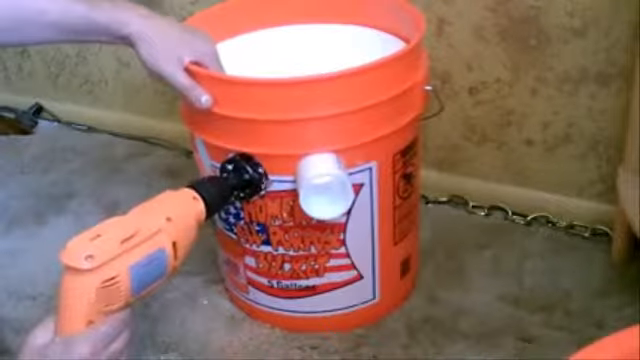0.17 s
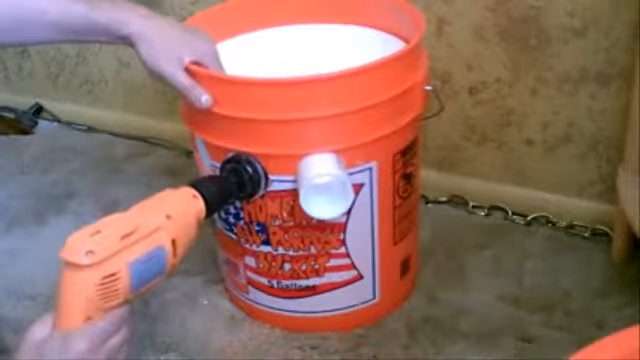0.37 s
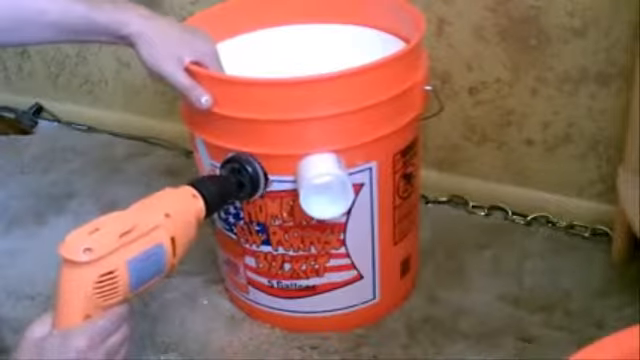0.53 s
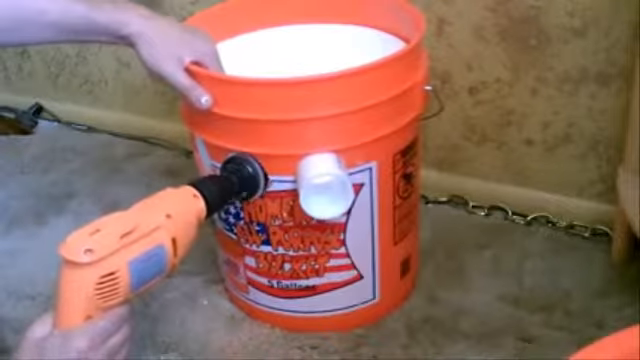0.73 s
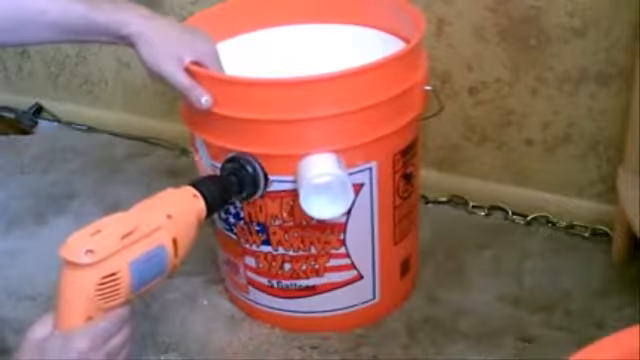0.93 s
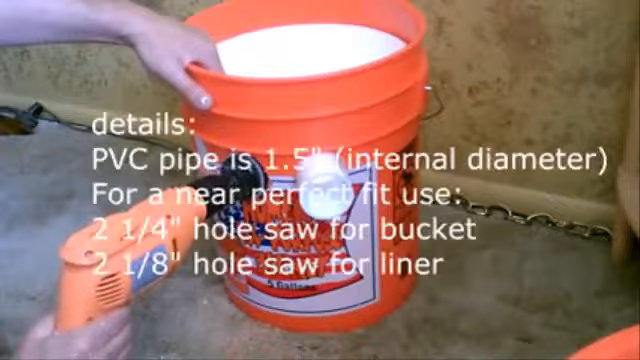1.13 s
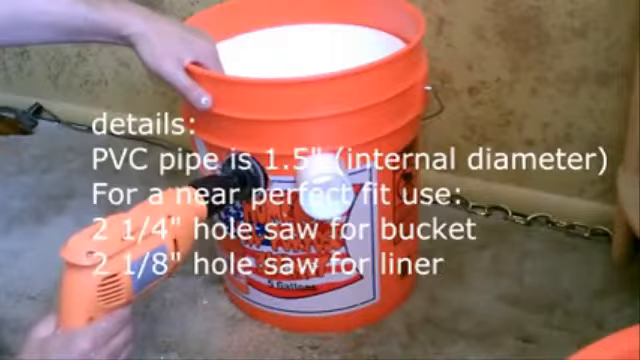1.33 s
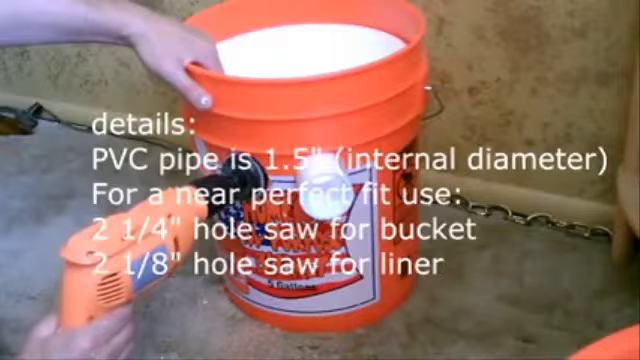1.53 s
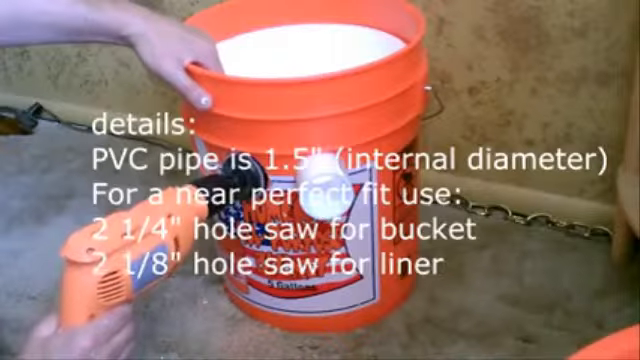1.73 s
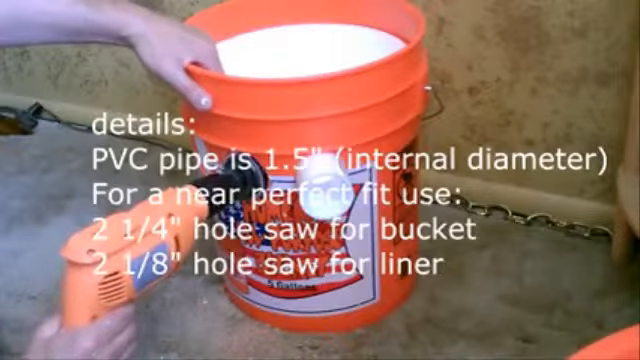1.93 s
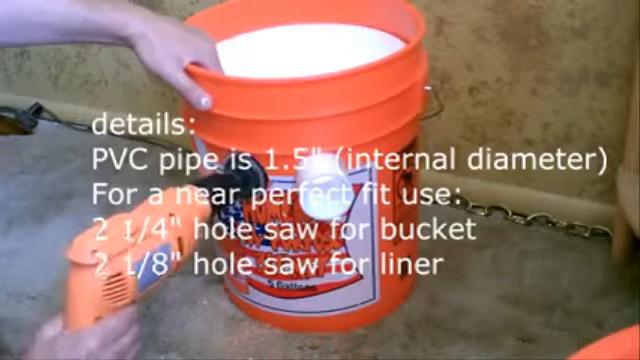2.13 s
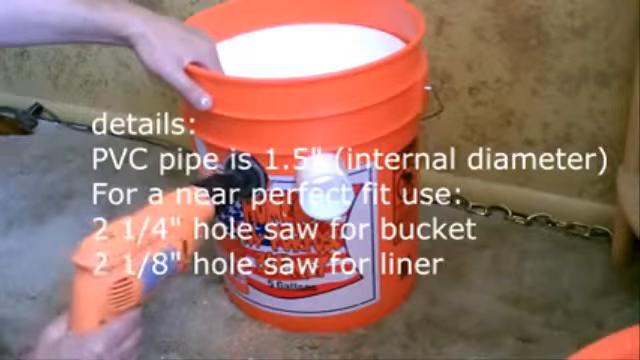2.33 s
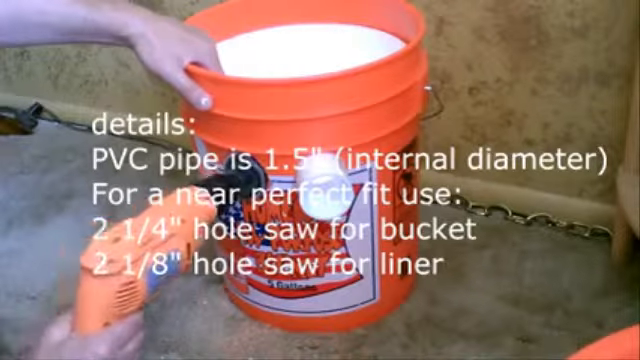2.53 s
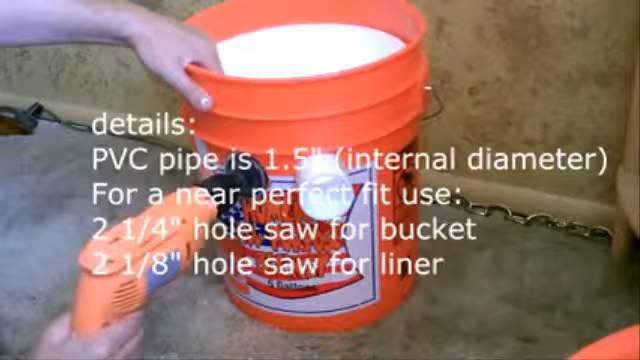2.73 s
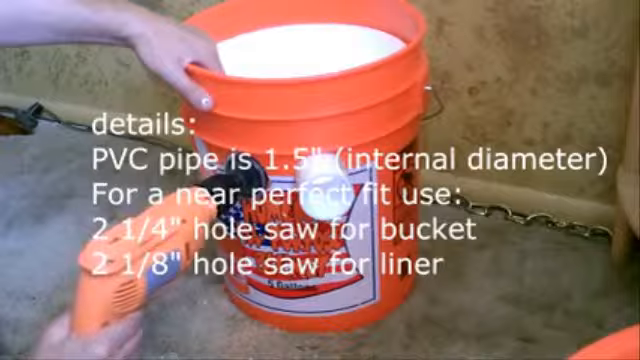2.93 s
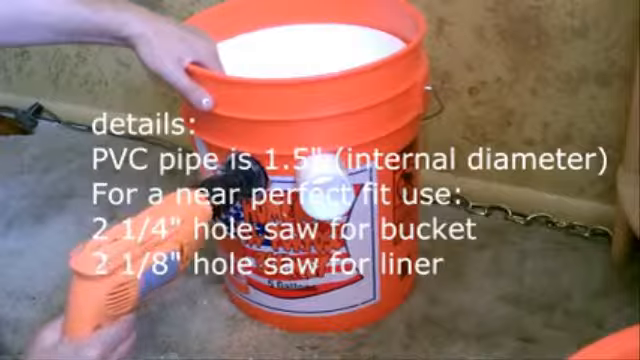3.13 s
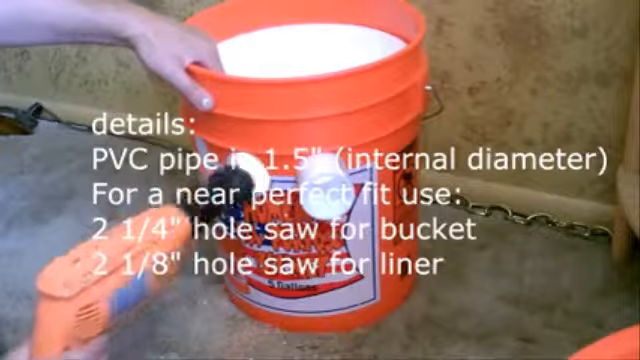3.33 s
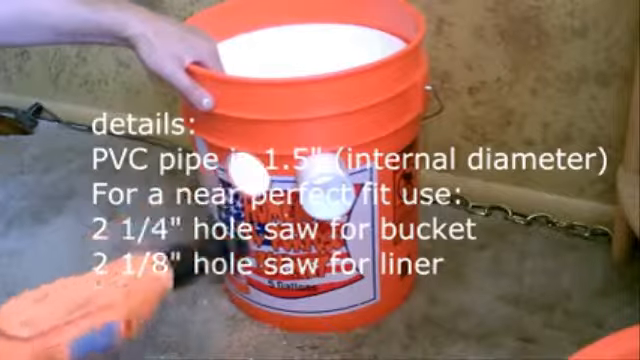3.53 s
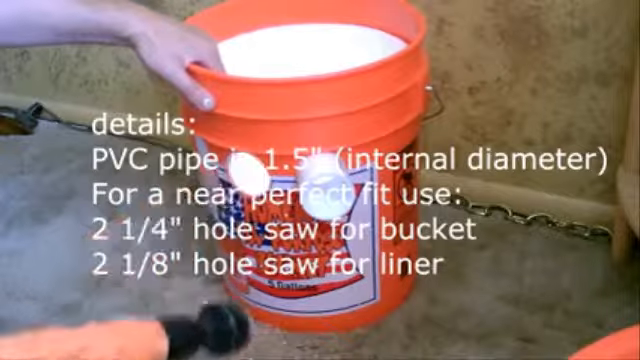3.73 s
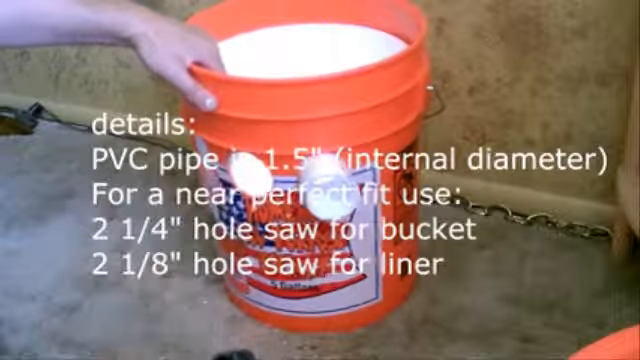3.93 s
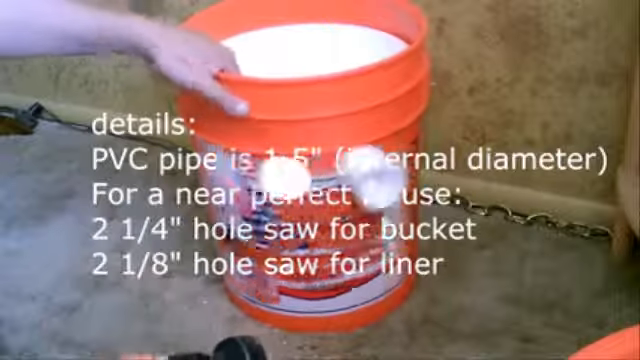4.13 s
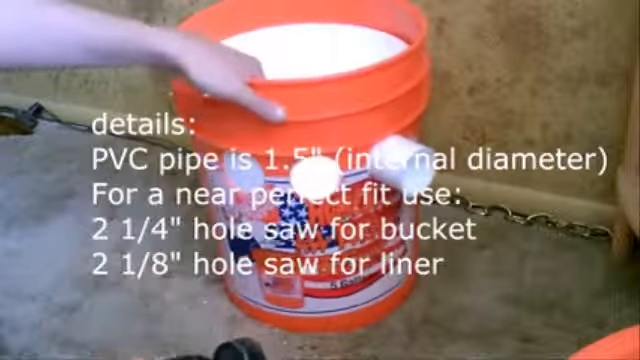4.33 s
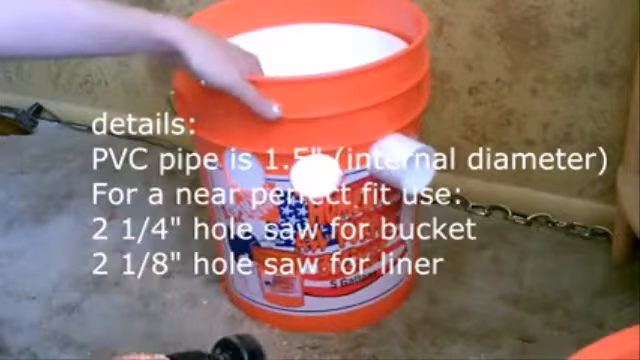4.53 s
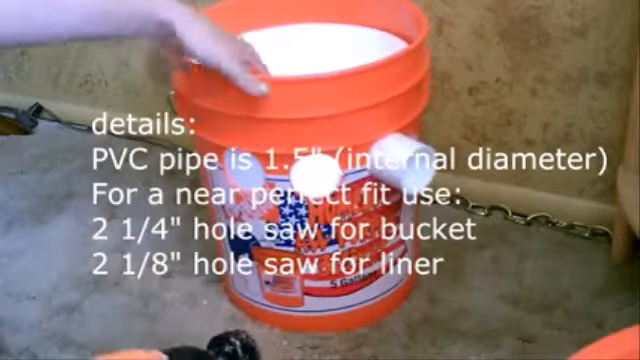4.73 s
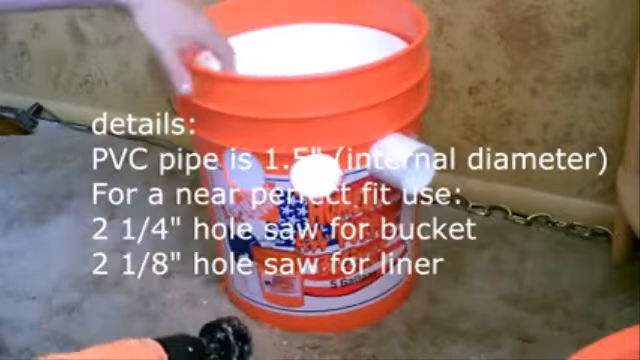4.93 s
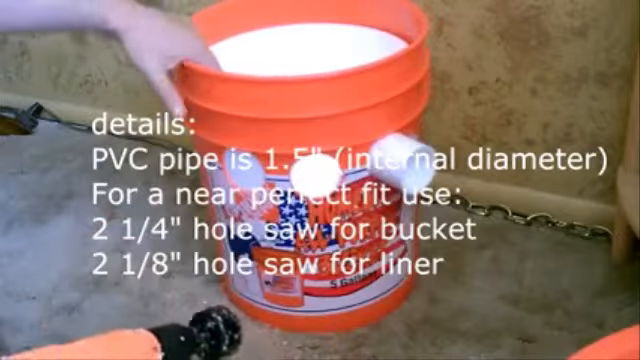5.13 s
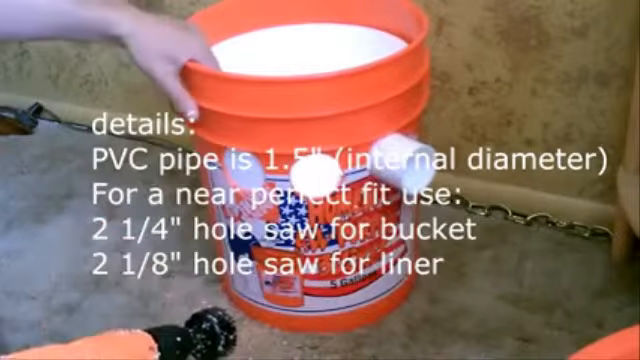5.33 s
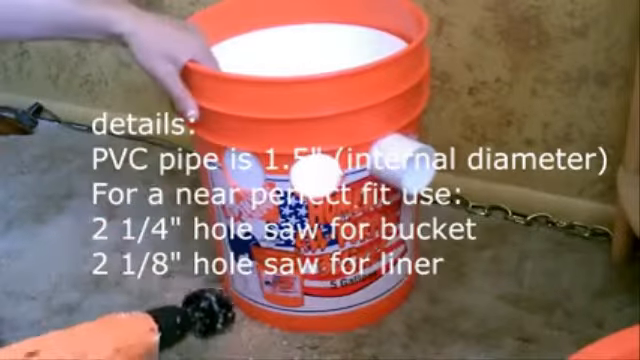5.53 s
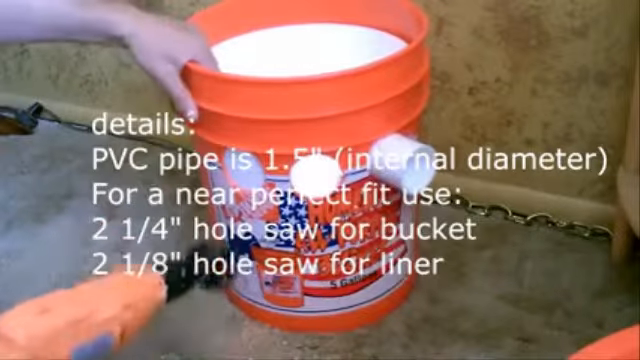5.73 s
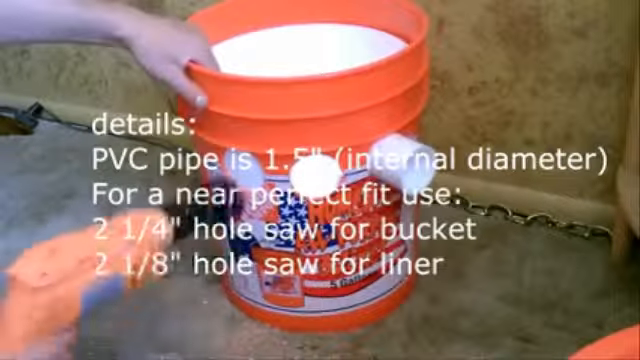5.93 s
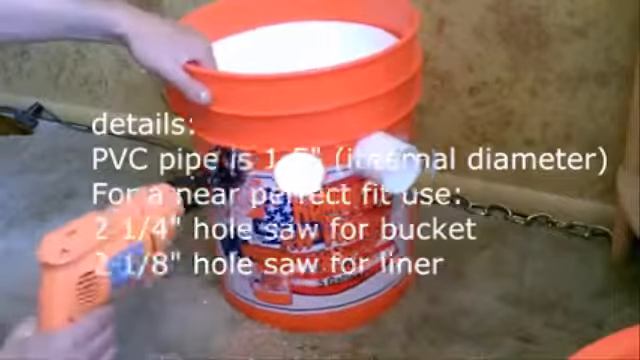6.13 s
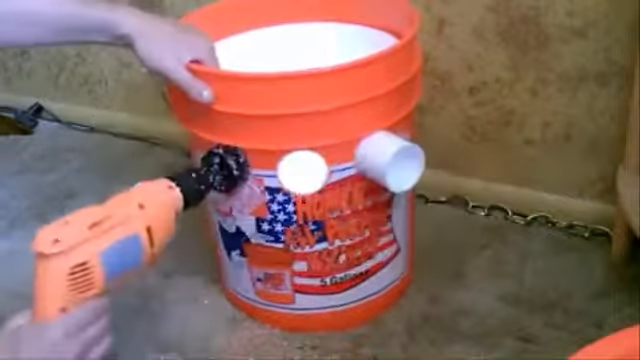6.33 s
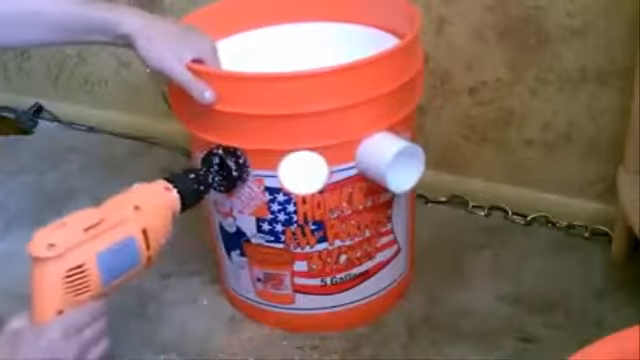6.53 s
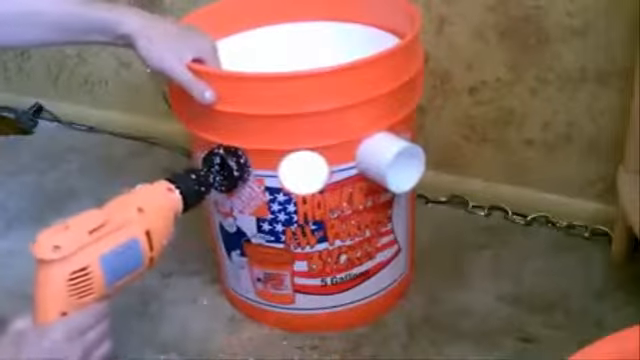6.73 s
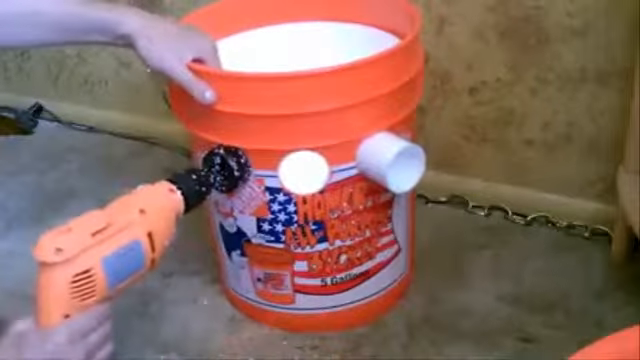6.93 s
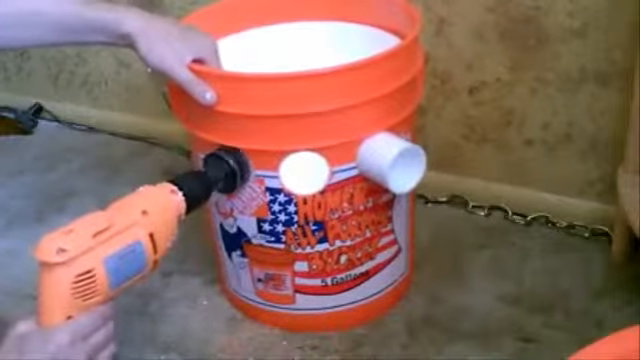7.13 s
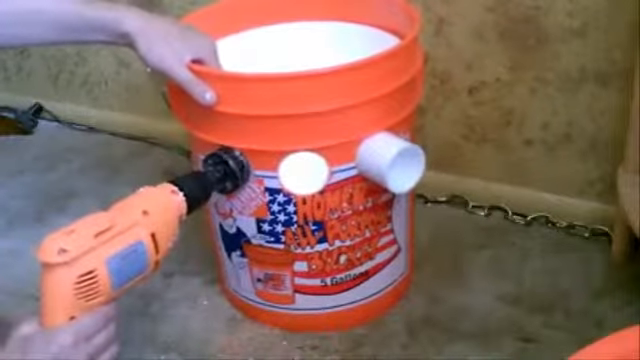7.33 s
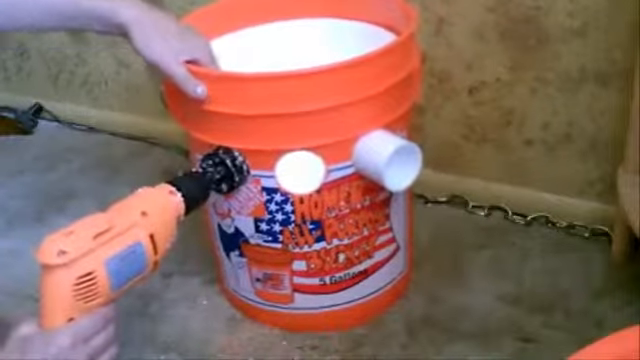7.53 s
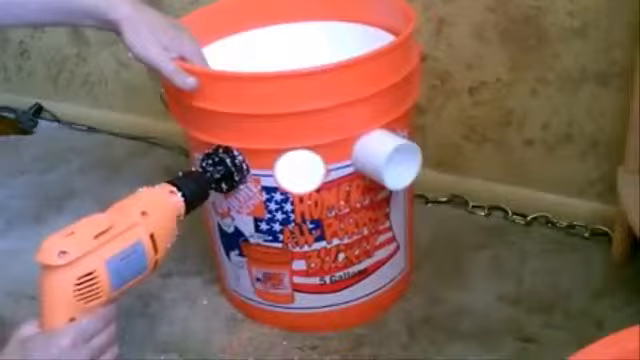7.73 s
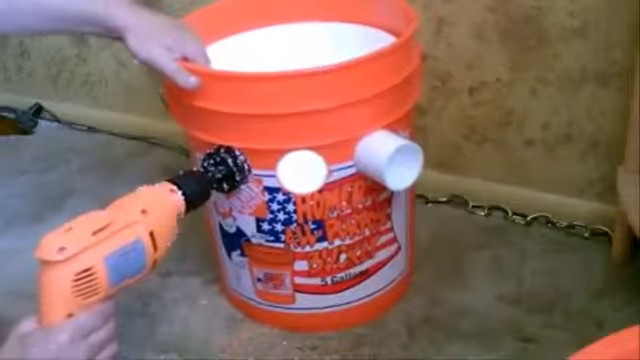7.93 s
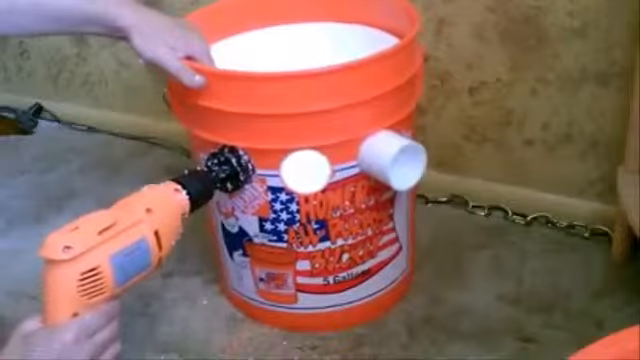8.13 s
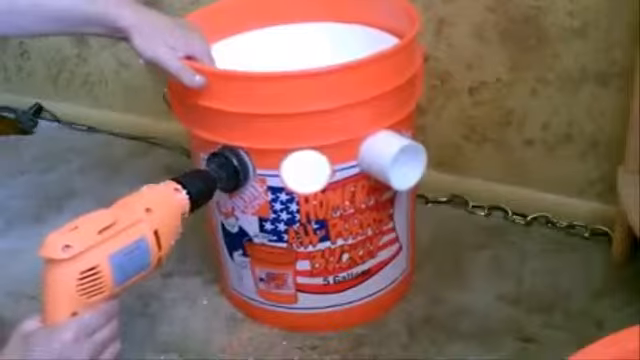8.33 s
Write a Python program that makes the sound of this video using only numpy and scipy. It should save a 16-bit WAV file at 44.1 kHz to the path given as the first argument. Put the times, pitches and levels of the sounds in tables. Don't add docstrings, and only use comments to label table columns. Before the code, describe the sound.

A corded drill drives a hole saw chattering loudly through a plastic bucket, whines down to a clicking stop, then knocks and two brief trigger bursts follow.

```python
import sys
import numpy as np
from scipy import signal
from scipy.fft import rfft, irfft, next_fast_len
from scipy.io import wavfile
from scipy.ndimage import uniform_filter1d, map_coordinates

SR = 44100
rng = np.random.default_rng(int(sys.argv[2]) if len(sys.argv) > 2 else 0)


def generate_wav(signal):
    frames = np.transpose(np.atleast_2d(signal))
    scaled = np.clip(frames, -1, 1) * 32767
    pcm = np.round(scaled).astype(np.int16)
    wavfile.write(sys.argv[1], SR, pcm)


def volts_from_decibels(level):
    exponent = np.asarray(level, float) / 20
    return 10 ** exponent


N = 373968

# f/Hz, density/dB per Hz
HUSH = [(30, -46.5), (110, -12.5), (250, -13.5), (600, -7), (1100, -8.5), (2000, -11.5), (4000, -15.5),
        (8000, -16.5), (9500, -23), (12000, -31.5)]
HUSH_DB, HUSH_SWAY_DB = -64, .3
# t/s, level over the hush/dB, half length/s
RUSTLE = (6.05, 2, .15)

# t/s, peak level/dB, bright level/dB, boom level/dB
KNOCKS = [(0.049, -35.5, -9, -27), (0.059, -28.5, -7.5, -31), (0.087, -33.5, -7, -38),
          (0.161, -43.5, -6, -16), (0.392, -36, -12, -31), (4.751, -41, -1, -28), (4.897, -40, -5, -30),
          (4.91, -41.5, -5, -30), (6.319, -34, -6.5, -33), (6.324, -25.5, -21, -36), (6.34, -41, -12, -29),
          (6.409, -43, -4, -23), (6.428, -29.5, -15, -26), (6.44, -36, -11, -25), (6.472, -29, -13, -20.5),
          (6.489, -39.5, -9, -16), (6.539, -46, -5, -19), (6.714, -49.5, -8, -27), (6.749, -50.5, -9, -27),
          (7.259, -33, -12, -18), (7.277, -20, -19, -16), (7.71, -31.5, -5.5, -23), (7.787, -33.5, -9, -26),
          (7.814, -37, 0.5, -31), (7.844, -40, -1, -14), (7.916, -43, -2, -28), (7.934, -25.5, -11, -34),
          (7.972, -37, -1, -29), (7.98, -35, -2, -31), (8.01, -42, 3, -30), (8.136, -49.5, 0, -30),
          (8.436, -30.5, -17, -20)]
# t/s, peak level/dB
TAPS = [(5.404, -54.5), (5.49, -59), (5.547, -56), (5.68, -56.5), (5.772, -43), (5.849, -55), (5.875, -58),
        (5.959, -52)]
TAP_BRIGHT_DB, TAP_BOOM_DB, TAP_HZ, KNOCK_HZ, KNOCK_SPREAD_HZ = -16.5, -31.5, 1240, 1140, 31
SCUFF_S, SCUFF_S_PER_DB, DULL_DB = .18, 0.014, -14

# t/s, peak level/dB
SWITCH = [
    (0.369, -34),
    (7.234, -28.5),
    (8.4127, -30),
]
# t/s, peak level/dB, f/Hz
EARLY_LASH = [(3.5722, -27, 2353), (3.5872, -19, 3000), (3.5976, -22.5, 2300), (3.6164, -19, 3720),
              (3.6287, -18, 3160), (3.642, -19.5, 3204), (3.6696, -20, 2930), (3.709, -25, 2440),
              (3.7269, -22.5, 3060), (3.7479, -17.5, 3020), (3.764, -29, 2605), (3.7923, -26, 3377),
              (3.8412, -24, 3040), (3.8535, -20, 3030), (3.8856, -18.5, 2586), (3.903, -20, 3660),
              (3.9164, -31, 3594), (3.9384, -24, 3513), (3.9524, -20.5, 3510), (3.9744, -24, 3696)]
# t/s, peak level/dB, f/Hz
LASH = [(4.0063, -26, 2560), (4.0465, -27, 3100), (4.0644, -25.5, 3100), (4.0748, -32, 3190),
        (4.0857, -24.5, 4240), (4.0989, -30, 3720), (4.1148, -30, 4240), (4.1284, -29, 2990),
        (4.1373, -28, 4240), (4.1488, -25.5, 3640), (4.159, -33, 3750), (4.1693, -26, 3650),
        (4.184, -33, 5100), (4.1998, -26, 3740), (4.2101, -29, 4220), (4.2225, -27, 3800),
        (4.2379, -27, 3625), (4.2531, -29, 3750), (4.2633, -27.5, 3730), (4.2744, -27, 4140),
        (4.2885, -34, 4210), (4.2962, -28, 3140), (4.3169, -32, 4170), (4.3287, -32, 3750),
        (4.3414, -34, 3770), (4.3523, -34, 3850), (4.3703, -33, 3150), (4.3786, -30, 3080),
        (4.3888, -30, 3700), (4.4069, -32, 3430), (4.4191, -34, 2940), (4.4343, -37, 4250),
        (4.4447, -31, 3320), (4.4589, -34, 4220), (4.4746, -34, 3030), (4.4928, -32, 3090),
        (4.5276, -35, 1910)]
# t/s, peak level/dB, f/Hz
LAST_TEETH = [(4.557, -25, 3060), (4.572, -27, 2950), (4.601, -32, 4410), (4.6112, -27, 4170),
              (4.6453, -25, 3700), (4.6789, -29, 2200), (4.7108, -41, 3760), (4.7715, -32, 2900),
              (4.821, -36, 1763), (4.869, -34, 1956)]

# t/s, tooth rate f/Hz
SPEED = [(0.401, 1488), (1.2, 3482), (1.52, 3885), (1.849, 4334), (2.2, 4586), (2.6, 4902), (2.849, 5186),
         (3.12, 5363), (3.302, 5406), (3.519, 5405), (3.65, 4816), (3.841, 3900), (4.07, 3020),
         (4.239, 2345), (4.421, 1776), (4.549, 1377), (4.951, 404)]
ON_S, OFF_S, REST_S, LET_GO_S = .39, 3.524, 4.98, 0.0617
FULL_HZ, STALL_HZ = 5400, 420

# f/Hz, width/Hz, level over the broad colour/dB
WHOLE_WALL = [(671, 40, 11), (808, 71, 9), (950, 110, 7.5), (1112, 75, 9), (1210, 43, 8), (1260, 48, 7),
              (1700, 22, 4.5), (1944, 170, 4.5), (2357, 61, 3.5)]
# f/Hz, width/Hz, level over the broad colour/dB
CUT_WALL = [(820, 32, 3), (974, 170, 10.5), (1131, 66, 14.5), (1240, 54, 11), (1337, 42, 8), (1560, 210, 7),
            (2000, 79, 7.5), (2364, 130, 9.5)]
# t/s, share of the kerf that is through
CUT = [(0, 0), (.9, 0), (1.3, 0.38), (2.08, 0.36), (2.2, 1.01), (5, 0.48), (6, 0.29), (8.48, 0.074)]
# f/Hz, density/dB per Hz
BITE = [(300, -46), (520, -27), (620, -8), (1100, -3.5), (2400, -6), (3500, -9.5), (5000, -40.5)]
# t/s, level of the bite/dB
FEED = [(.39, -43), (.5, -33), (.66, -23), (1.14, -18), (1.45, -17), (2.56, -18), (2.63, -23), (3.3, -25.5),
        (3.55, -23.5)]
# t/s, level over the feed/dB, half length/s
GRABS = [(0.717, 2, 0.062), (0.861, 4.5, 0.038), (0.944, -1.5, 0.042), (1.452, 3, 0.066),
         (1.545, -2, 0.032), (1.78, 2, 0.073), (2.043, 2.5, 0.044), (2.166, -4, 0.048), (2.734, 3.5, 0.046),
         (3.25, 1, 0.032), (3.333, -3, 0.045), (3.385, 4, 0.021), (3.5, 8.5, 0.064)]

# f/Hz, width/Hz, level/dB
HOUSING = [(1000, 190, 9.5), (1730, 90, -9), (1913, 66, 8.5), (2200, 25, 0), (2404, 50, 7.5),
           (2550, 220, 4.5), (2990, 160, 5), (3253, 110, 6), (3776, 70, 6.5), (4450, 200, 4.5),
           (4790, 87, 6), (5127, 150, 6), (5920, 34, -1.5)]
# f/Hz, width/Hz, level/dB
LOOSE = [(970, 205, 9), (1850, 150, 5), (3020, 310, 6), (3750, 220, 5), (4240, 200, 7), (5200, 440, 8.5)]
# f/Hz, density/dB per Hz
RATTLE = [(300, -50.5), (500, -21), (800, -9.5), (2200, -3), (4200, -6), (5600, -10.5), (7000, -14),
          (9500, -43.5)]
GEAR_DB, GEAR_LAG_DB, GEAR_RISE_S, GEAR_GRAB = -18, 27, 0.33, 0.36

# f/Hz, density/dB per Hz
FAN = [(3500, -29.5), (5500, 1.5), (7000, 0.5), (9000, 2), (10000, -5.5), (12500, 6), (13600, -3.5),
       (14200, -21), (15500, -34)]
FAN_DB, FAN_POWER, FAN_LAG_DB, FAN_RISE_S = -30.5, 1.47, 10, 0.036

# f/Hz, density/dB per Hz
BOOM = [(15, -62.5), (25, -27), (59, -24.5), (112, -22), (193, -5), (292, 1.5), (373, -7.5), (430, 2.5),
        (550, -0.5), (720, -29.5), (1210, -120)]
BOOM_DB, BOOM_LAG_DB, BOOM_RISE_S, HOLE_DB, HOLE_S = -44.5, 14, 0.064, 2, 3.0
# t/s, level over the boom/dB, half length/s
THUMP = (3.48, 13, 0.026)

# level at full speed/dB, power of speed
IDLE = [
    (-28, 2.44),
    (-29, 0.94),
    (-38, 2),
    (-49.5, 2.53),
]
# t/s, bite level/dB, rattle level/dB
BLIPS = [
    [(7.25, -54, -48), (7.278, -33.5, -50), (7.304, -35.5, -35), (7.404, -28, -30), (7.445, -26, -31),
     (7.49, -30.5, -38), (7.648, -50.5, -41), (7.72, -60, -51), (7.78, -58, -73)],
    [(8.42, -54, -51), (8.434, -43.5, -48), (8.468, -43, -37), (8.48, -33, -44)],
]
# t on/s, t off/s, level/dB
BLIP_HISS = [
    (7.302, 7.663, -43.5),
    (8.441, 8.6, -52),
]
BLIP_BOOM_DB, HISS_EDGE_DB_PER_S = -16, 597.5

# ratio to the tooth rate, f/Hz, level/dB, half width/Hz
DRIVEN = [(1, 4420, -34.5, 100), (0.95, 4570, -30.5, 74), (0.97, 4780, -38.5, 110), (.93, 4380, -33.5, 100),
          (.8, 3170, -31.5, 130), (.8, 3345, -28, 79.96), (.8, 3730, -32, 80), (.8, 3910, -33, 100.5),
          (.8, 4120, -36, 98.7), (.8, 4330, -32, 70), (.5, 2302, -34, 149.4), (.5, 2512, -34, 99.6),
          (.5, 2690, -29, 99.9)]
# ratio to the tooth rate, f/Hz, level/dB, half width/Hz
FREE = [(1, 5370, -29.5, 90), (1, 5200, -32, 100), (1, 4760, -33, 120), (1, 4510, -33, 157.4),
        (1, 4230, -35.5, 149.3), (1, 3986, -33.5, 110), (1, 3501, -45, 471), (2, 7507, -50, 999),
        (2, 6126, -47, 399), (2, 5150, -38, 240), (2, 4380, -40, 270), (2, 3720, -46, 359),
        (3, 5102, -50, 290), (.5, 2500, -38.5, 200), (.93, 4830, -39, 150.1)]
COAST = (1, 0.33)
# tooth rate f/Hz, level/dB, half width/Hz
IDLER = (5800, -40.5, 450)

# t/s, f/Hz, level/dB, half length/s
CHATTER = [(0.639, 688, -25.5, 0.031), (0.702, 648, -23.5, 0.026), (0.746, 1052, -23.5, 0.036),
           (0.801, 1160, -29, 0.12), (0.888, 1940, -27.5, 0.029), (1.283, 2454, -22.5, 0.031),
           (1.431, 1960, -25, 0.045), (1.434, 1207, -24, 0.073), (1.434, 2411, -24, 0.15),
           (1.666, 1894, -25, 0.03), (1.736, 2387, -24.5, 0.1), (1.797, 2364, -17.5, 0.029),
           (2.023, 1910, -26.5, 0.087), (2.061, 2327, -22, 0.034), (2.073, 1160, -18.5, 0.015),
           (2.075, 1996, -24.5, 0.068), (2.241, 2300, -21, 0.038), (2.316, 1670, -21.5, 0.041),
           (2.322, 2350, -24.5, 0.033), (2.371, 1622, -25.5, 0.035), (2.453, 2666, -27.5, 0.055),
           (2.482, 2186, -25.5, 0.07), (2.543, 2192, -24, 0.084), (2.664, 2330, -26, 0.026),
           (2.766, 2350, -22.5, 0.085), (2.859, 2373, -23, 0.11), (2.99, 2368, -25.5, 0.058),
           (3.396, 994, -24.5, 0.05), (3.439, 2665, -29.5, 0.061), (3.468, 989, -15, 0.033),
           (3.486, 1981, -22.5, 0.029), (3.498, 1460, -25, 0.027), (3.498, 2454, -27.5, 0.034)]
# t/s, f/Hz, level/dB, half
# length/s
MORE_CHATTER = [(.455, 1096, -38.5, .012), (.485, 1090, -39, .012), (.51, 2000, -41, 0.017),
                (.6, 656, -35.5, 0.035), (1.3, 2700, -25, 0.046), (1.5, 1340, -27, .05),
                (1.8, 1330, -21.5, 0.051), (2.3, 1553, -26, .04), (2.45, 1613, -24, .05),
                (3.01, 3780, -29, .015), (.55, 620, -43, 0.046), (4.914, 1345, -52, .008),
                (5.78, 1232, -66.5, 0.028), (5.86, 1240, -66, .03), (6.327, 1173, -38, .003),
                (7.31, 1131, -32.5, 0.022), (7.32, 3160, -38, 0.023), (7.282, 1130, -35, 0.006),
                (7.385, 1126, -38, .012), (7.42, 3160, -36, 0.038), (7.445, 1120, -34.5, .02),
                (7.48, 1120, -32.5, 0.031), (7.54, 1099, -43, .03)]
CHATTER_DB, CHATTER_SPREAD, CHATTER_SHAKE_DB = -3.5, .02, 2.5
CHATTER_BEAT, CHATTER_TEETH = .6, 36

# t/s, peak level/dB, f/Hz
SLAPS = [(0.6956, -14, 1280), (0.7889, -15.5, 1142), (0.8762, -11, 1100), (0.957, -15.5, 1234),
         (1.0146, -10, 1205), (1.0433, -9.5, 1050), (1.0771, -10.5, 1076), (1.2172, -10.5, 1140),
         (1.2659, -11, 1125), (1.2873, -8.5, 1210), (1.3364, -11, 1210), (1.3701, -9, 1213),
         (1.4259, -8, 1221), (1.4739, -11, 1284), (1.5267, -14.5, 1270), (1.5479, -13, 1102),
         (1.6365, -12, 1307), (1.6761, -12.5, 1103), (1.734, -8.5, 1130), (1.7713, -11.5, 1185),
         (1.8175, -12.5, 1120), (1.846, -11, 1118), (1.9448, -8, 1174), (1.9902, -9, 1133),
         (2.0165, -11, 1156), (2.0525, -8, 1182), (2.1122, -8.5, 1120), (2.157, -16, 1128),
         (2.2066, -10, 1174), (2.2367, -6.5, 1125), (2.2827, -13, 1285), (2.3114, -8.5, 1117),
         (2.3561, -12, 1120), (2.3941, -9.5, 1132), (2.434, -6.5, 1210), (2.4725, -8, 1210),
         (2.5096, -9.5, 1290), (2.5465, -10, 1110), (2.583, -11, 1120), (2.6707, -11.5, 1147),
         (2.7165, -11.5, 1220), (2.7455, -9, 1117)]
SLAP_DB, SLAP_RISE_S, SLAP_T60, SLAP_SPREAD = 2.5, .003, .075, .035

# f/Hz, decay time t60/s
SHED = [(200, 0.32), (1500, 0.19), (9000, 0.28)]

# t from/s, t to/s
SWAPS = [
    (.39, 2.53),
    (7.24, 8.6),
]
STAND_IN_HZ, STAND_IN_DB, STAND_IN_POWER = 9819, 7.5, 1.146


def unit(x):
    return x / np.sqrt(np.mean(x ** 2) + 1e-20)


def along(points, hz):
    f, v = np.transpose(points)
    return np.interp(np.log(hz + 1), np.log(f + 1), v)


def wobble(rate):
    at = np.arange(0, N + 32, 32)
    knots = rng.standard_normal(N // 100)
    return np.interp(np.arange(N), at, map_coordinates(knots, [at * rate / SR]))


def filtered(x, response):
    m = next_fast_len(len(x) + SR // 2)
    return irfft(rfft(x, m) * response(np.fft.rfftfreq(m, 1 / SR)), m)[:len(x)]


def coloured_noise(spectrum):
    return unit(filtered(rng.standard_normal(N), lambda f: volts_from_decibels(along(spectrum, f))))


def peak(f, hz, width):
    return 1j * f * width / (hz * hz - f * f + 1j * f * width)


def body(modes, spectrum):
    def response(f):
        resonances = sum((volts_from_decibels(db) - 1) * peak(f, hz, w) for hz, w, db in modes)
        return volts_from_decibels(along(spectrum, f)) * (1 + resonances)
    return response


def hump(x, centre, height, half):
    return height * np.exp(-((x - centre) / half) ** 2)


def hush():
    level_db = HUSH_DB + HUSH_SWAY_DB * wobble(2.3) + hump(np.arange(N) / SR, *RUSTLE)
    return volts_from_decibels(level_db) * coloured_noise(HUSH)


def knocks():
    push, t = np.zeros((4, N + SR)), np.arange(SR // 3) / SR
    rows = [(*row, KNOCK_HZ) for row in KNOCKS]
    rows += [(s, db, TAP_BRIGHT_DB, TAP_BOOM_DB, TAP_HZ) for s, db in TAPS]
    for s, db, bright_db, boom_db, hz in rows:
        hz = hz + KNOCK_SPREAD_HZ * rng.standard_normal()
        t60 = SCUFF_S + SCUFF_S_PER_DB * max(bright_db - DULL_DB, 0)
        scuff = (volts_from_decibels(-60 * t / 0.024) + .5 * volts_from_decibels(-60 * t / t60)) * (1 - np.exp(-t / 0.003))
        ping = np.sin(2 * np.pi * hz * t) * volts_from_decibels(-60 * t / 0.021) * (1 - np.exp(-t / 0.0037))
        rub = volts_from_decibels([[0], [bright_db], [boom_db]]) * scuff * rng.standard_normal((3, len(t)))
        start = round(s * SR)
        push[:, start:start + len(t)] += volts_from_decibels(db) * np.vstack([rub, ping])

    def wall_response(f):
        modes = peak(f, 1090, 190) + 0.61 * peak(f, 940, 150) + 0.27 * peak(f, 790, 120)
        return peak(f, 760, 950) * modes

    def scrape_response(f):
        modes = .5 * peak(f, 2350, 190) + 0.099 * peak(f, 3150, 200) + 0.16 * peak(f, 5900, 4000)
        return peak(f, 1630, 3050) ** 2 + modes

    ring = filtered(push[0], wall_response)
    scrape = filtered(push[1], scrape_response)
    boom = filtered(push[2], lambda f: peak(f, 250, 128) ** 2 + .07 * peak(f, 100, 70) ** 2)
    return (volts_from_decibels(4.5) * ring + volts_from_decibels(7.5) * scrape + volts_from_decibels(25.5) * boom + volts_from_decibels(6.5) * push[3])[:N]


def ticks(rows, ping):
    out, t = np.zeros(N), np.arange(800) / SR
    for s, db, hz in rows:
        tone = .8 * np.sin(2 * np.pi * hz * t)
        for ratio in rng.uniform([.5, 1.15], [.8, 1.4]):
            tone = tone + .4 * np.sin(2 * np.pi * ratio * hz * t)
        noise = (1.05 - .5 * ping) * rng.standard_normal(len(t))
        tick = ping * tone * volts_from_decibels(-60 * t / .022) + noise
        envelope = volts_from_decibels(db + 1.5 - 60 * t / 0.024) * (1 - np.exp(-t / 0.00081))
        out[round(s * SR):][:len(t)] += envelope * tick
    return filtered(out, lambda f: (f / 900) ** 2 / (1 + (f / 900) ** 2) / (1 + (f / 7000) ** 4))


def trigger():
    return ticks([(s, db, 4400) for s, db in SWITCH], ping=.4)


def gear_teeth():
    rows = [(s, db + 4, hz) for s, db, hz in EARLY_LASH]
    rows += [(s, db + 9, hz) for s, db, hz in LASH]
    return ticks(rows + list(LAST_TEETH), ping=1)


def speed():
    t = np.arange(N) / SR
    s, hz = np.transpose(SPEED)
    tooth = np.interp(t, np.r_[s, 7.2], np.r_[hz, 2000])
    current = np.clip((OFF_S + LET_GO_S - t) / (2 * LET_GO_S), 0, 1) * (t > ON_S)
    return t, tooth, current


def curves(*tables):
    t = np.arange(N) / SR
    out = np.full((len(tables[0][0]) - 1, N), -120.)
    for rows in tables:
        s, *cols = np.transpose(rows)
        inside = (t >= s[0]) & (t <= s[-1])
        out[:, inside] = [np.interp(t[inside], s, c) for c in cols]
    return uniform_filter1d(out, size=128, axis=1)


def levels():
    t, tooth, current = speed()

    def lag(db, rise_s):
        return db * np.exp(-np.abs(t - ON_S) / rise_s)

    grab = sum(hump(t, *row) for row in GRABS)
    speed_db = 20 * np.log10(tooth / FULL_HZ)
    driven = [np.interp(t, *np.transpose(FEED)) + grab,
              GEAR_DB - lag(GEAR_LAG_DB, GEAR_RISE_S) + GEAR_GRAB * grab,
              FAN_DB + FAN_POWER * speed_db - lag(FAN_LAG_DB, FAN_RISE_S),
              BOOM_DB - lag(BOOM_LAG_DB, BOOM_RISE_S) + HOLE_DB * (t > HOLE_S) + hump(t, *THUMP)]
    left_db = 20 * np.log10(np.clip((tooth - STALL_HZ) / (FULL_HZ - STALL_HZ), 1e-3, 1))
    idle = [db + power * left_db for db, power in IDLE]
    run = current * np.array(driven) + (1 - current) * np.array(idle)
    run = np.where((t > ON_S) & (t < REST_S), run, -120)
    bite_db, rattle_db = curves(*BLIPS)
    hisses = []
    for on, off, db in BLIP_HISS:
        outside_s = np.clip(np.maximum(on - t, t - off), 0, 1)
        hisses.append(db - HISS_EDGE_DB_PER_S * outside_s)
    blips = [bite_db, rattle_db, np.max(hisses, axis=0), bite_db + BLIP_BOOM_DB]
    return uniform_filter1d(np.maximum(run, blips), size=128, axis=1)


def bursts(rate_hz, t60, spread_db, slip, share):
    turns = np.cumsum(rate_hz * (1 + slip * wobble(150))) / SR
    hit = np.diff(np.floor(turns), prepend=0) > 0
    t = np.arange(1500) / SR
    shape = volts_from_decibels(-60 * t / t60) * (1 - np.exp(-t / 0.00071))
    gate = signal.fftconvolve(hit * volts_from_decibels(spread_db * rng.standard_normal(N)), shape)[:N]
    gate = gate / np.sqrt(np.abs(uniform_filter1d(gate ** 2, size=SR // 8)) + 1e-9)
    share = np.clip(share, 0, 1)
    return (share * gate + 1 - share) * rng.standard_normal(N)


def saw_bite():
    t, tooth, _ = speed()
    teeth_in = bursts(tooth / 12, t60=0.0077, spread_db=-0.5, slip=0.46, share=0.3)
    cut = np.interp(t, *np.transpose(CUT))
    whole = unit(filtered(teeth_in, body(WHOLE_WALL, BITE)))
    opened = unit(filtered(teeth_in, body(CUT_WALL, BITE)))
    return (1 - cut) * whole + cut * opened


def gear_rattle():
    t, tooth, current = speed()
    share = np.clip(.8 - tooth / 8000, .1, .55) * np.clip(tooth / 2200, 0, 1) * (.5 + .2 * current)
    lash = bursts(tooth / 26, t60=.022, spread_db=4, slip=.4, share=share)
    slack = np.interp(t, [3.5, 3.7, 4.6, 5], [0, 1, 1, 0])
    loaded = unit(filtered(lash, body(HOUSING, RATTLE)))
    loose = unit(filtered(lash, body(LOOSE, RATTLE)))
    return (1 - slack) * loaded + slack * loose


def drill():
    bite_db, rattle_db, fan_db, boom_db = levels()
    tooth = speed()[1]
    turn = np.cos(2 * np.pi * np.cumsum(tooth / 186) / SR + 1.5 * wobble(6.7))
    throb_db = .7 * turn + .8 * wobble(50)
    bite = volts_from_decibels(bite_db - 2.0 + throb_db) * saw_bite()
    rattle = volts_from_decibels(rattle_db - 3.0 + 0.22 * turn) * gear_rattle()
    fan = volts_from_decibels(fan_db + 1.5 + 0.74 * turn + 1.2 * wobble(30)) * coloured_noise(FAN)
    boom = volts_from_decibels(boom_db + 1.0 + 0.35 * turn) * coloured_noise(BOOM)
    return bite + rattle + fan + boom


def whine(hz, db, rough):
    phase = 2 * np.pi * np.cumsum(hz * (1 + rough * wobble(90))) / SR
    return np.sqrt(2) * volts_from_decibels(db + .9 * wobble(70)) * np.sin(phase)


def gears():
    t, tooth, current = speed()
    idle = (1 - current) * (t > ON_S) * (t < REST_S)

    def swell(rows, ratio):
        return sum(hump(ratio * tooth, hz, volts_from_decibels(db), w) for r, hz, db, w in rows if abs(r - ratio) < .03)

    def level_db(ratio):
        return 20 * np.log10(current ** 2 * swell(DRIVEN, ratio) + idle * swell(FREE, ratio) + 1e-6)

    out = np.zeros(N)
    for ratio, rough in [(1, .004), (3, .006), (2, .006), (.8, .002), (.93, .002)]:
        out = out + whine(ratio * tooth, level_db(ratio), rough)
    growl_db = level_db(.5)
    beat = 1 + 1.6 * np.cos(2 * np.pi * np.cumsum(tooth / 88) / SR)
    out = out + beat * whine(.5 * tooth, growl_db - 2.0, rough=0.0033)
    out = out + whine(tooth / 38, 2.5 * growl_db + 12.0, rough=0.033)
    idler_hz, idler_db, idler_half_hz = IDLER
    free = idle * hump(tooth, idler_hz, 0.89, idler_half_hz)
    out = out + free * sum(whine(ratio * tooth, idler_db, rough=.002) for ratio in COAST)
    housing = body(HOUSING, [(100, 0)])
    return filtered(out, lambda f: .9 + .06 * housing(f))


def chatter():
    out, drift = np.zeros(N), wobble(160)
    throb_phase = 2 * np.pi * np.cumsum(speed()[1] / CHATTER_TEETH) / SR + 1.5 * wobble(30)
    shake = volts_from_decibels(CHATTER_DB + CHATTER_SHAKE_DB * wobble(120))
    shake = shake * (1 + CHATTER_BEAT * np.cos(throb_phase))
    for s, hz, db, half in list(CHATTER) + list(MORE_CHATTER):
        at = np.arange(round((s - .25) * SR), round((s + .25) * SR))
        phase = 2 * np.pi * np.cumsum(hz * (1 + CHATTER_SPREAD * drift[at])) / SR
        out[at] += hump(at / SR, s, volts_from_decibels(db), half) * shake[at] * np.sqrt(2) * np.sin(phase)
    return out


def slaps():
    out, t, drift = np.zeros(N), np.arange(SR // 10) / SR, wobble(200)
    for s, db, hz in SLAPS:
        start = round((s - SLAP_RISE_S) * SR)
        at = slice(start, start + len(t))
        phase = 2 * np.pi * np.cumsum(hz * (1 + SLAP_SPREAD * drift[at])) / SR
        envelope = volts_from_decibels(db + SLAP_DB - 60 * t / SLAP_T60) * (1 - np.exp(-t / SLAP_RISE_S))
        out[at] += envelope * np.sin(phase)
    return out


def shed(x):
    hz, t, z = signal.stft(rng.standard_normal(SR // 2), SR, nperseg=256)
    tail = signal.istft(z * volts_from_decibels(-60 * t / along(SHED, hz)[:, None]), SR, nperseg=256)[1]
    return signal.fftconvolve(np.pad(x, (300, 0)), tail / np.linalg.norm(tail))[:N]


def scene():
    taps = knocks() + trigger() + gear_teeth()
    machine = drill() + gears() + chatter() + slaps()
    return (hush() + taps + volts_from_decibels(-5) * shed(taps) + machine)[None]


def treble_strips_db(hz, shape):
    field = uniform_filter1d(rng.standard_normal(shape), size=2, axis=0)
    field = unit(uniform_filter1d(field, size=14, axis=1))
    seams = np.abs(peak(hz, 6150, 150)) + 1.2 * np.abs(peak(hz, 6800, 150)) + .7 * np.abs(peak(hz, 7700, 200))
    bar = along([(1500, 2.9), (3800, 2.3), (5300, 1.7), (5700, 1.0), (8600, .95), (9300, 2.6), (10100, 3),
                 (10300, .7), (11300, 1.2)], hz)
    return -200 * np.clip(field - (bar - .7 * seams)[:, None], 0, .2)


def low_pass(x):
    return signal.sosfilt(signal.butter(12, 15560, fs=SR, output="sos"), x)


def record(dry):
    soft = dry[0] / (1 + np.abs(dry[0] / 1.1) ** 4) ** .25
    no_bass = filtered(soft, lambda f: 1 / (1 + (40 / (f + 1)) ** 2))
    hz, t, z = signal.stft(no_bass, SR, nperseg=1024)
    local = uniform_filter1d(np.abs(z), size=9, axis=0) + 1e-12
    contrast = along([(500, .1), (3000, .25), (6000, .4), (12000, .3)], hz)[:, None]
    z = z * (np.abs(z) / local + 1e-3) ** contrast
    swapped = np.any([(t > start) & (t < end) for start, end in SWAPS], axis=0)
    top = (hz > 9330) & (hz < 10200)
    band = uniform_filter1d(np.sum(np.abs(z[top]) ** 2, axis=0), size=5) ** (STAND_IN_POWER / 2)
    clock = np.arange(N) / SR
    tone = volts_from_decibels(STAND_IN_DB) * np.interp(clock, t, band * swapped)
    shelf_db = -26 * (hz > 10120)[:, None]
    gain_db = treble_strips_db(hz, z.shape) + shelf_db - 8.3 * np.outer(top, swapped)
    mix = signal.istft(z * volts_from_decibels(gain_db), SR, nperseg=1024)[1][:N]
    mix = mix + np.sqrt(2) * tone * np.sin(2 * np.pi * STAND_IN_HZ * clock)
    return low_pass(mix[None])


dry = scene()
out = record(dry)
generate_wav(out)
```